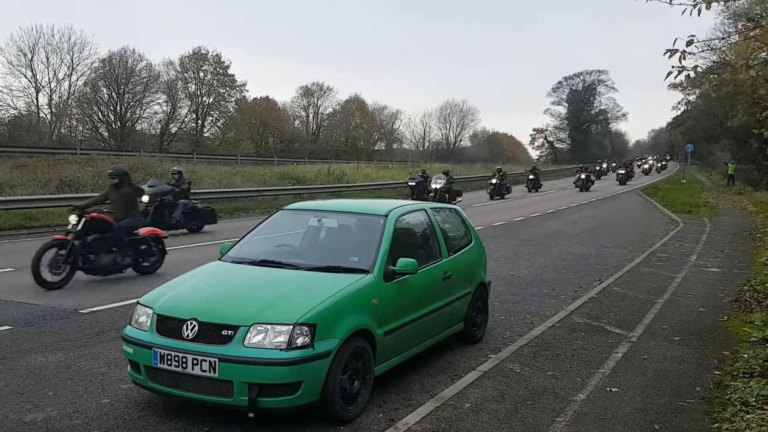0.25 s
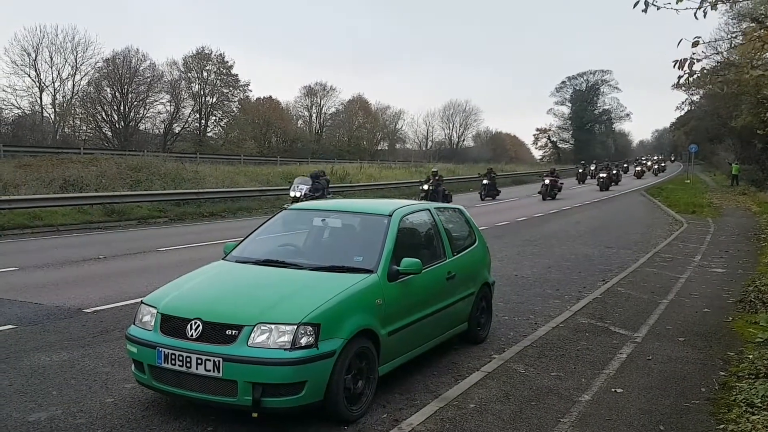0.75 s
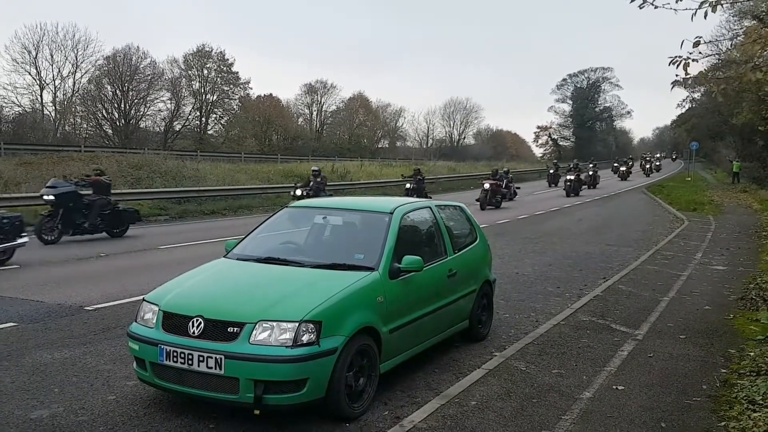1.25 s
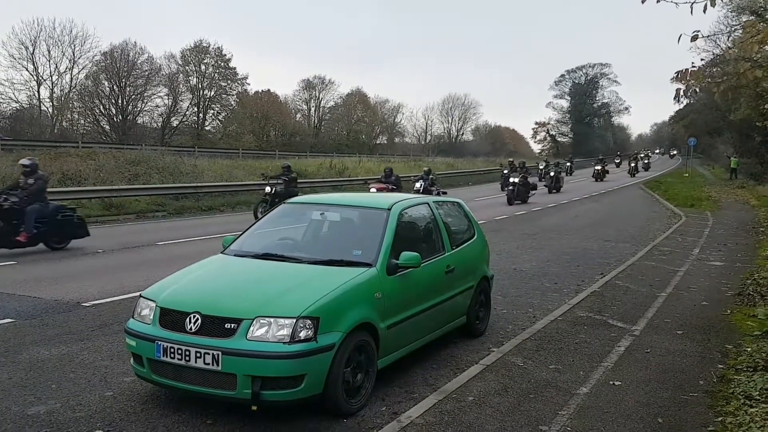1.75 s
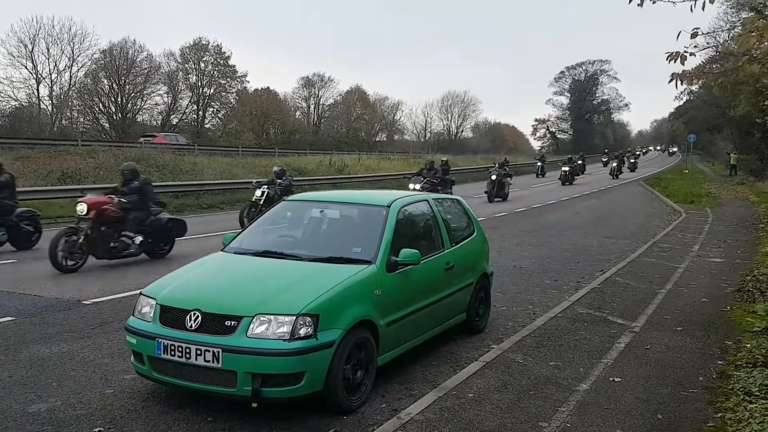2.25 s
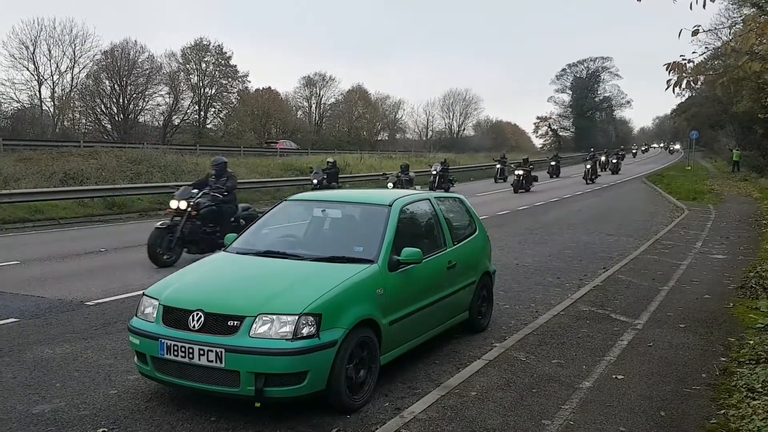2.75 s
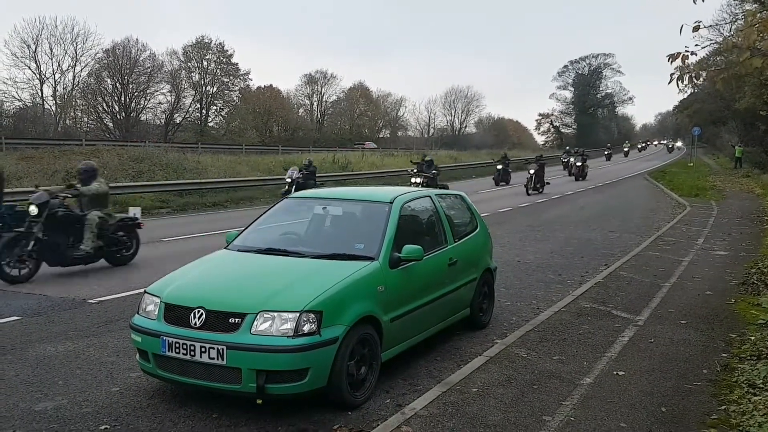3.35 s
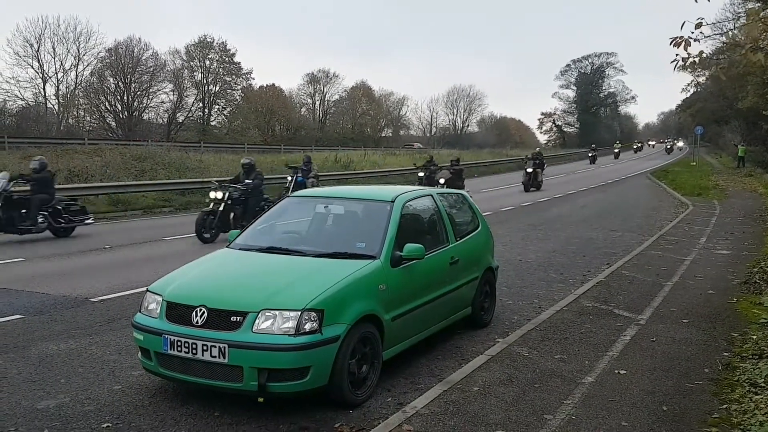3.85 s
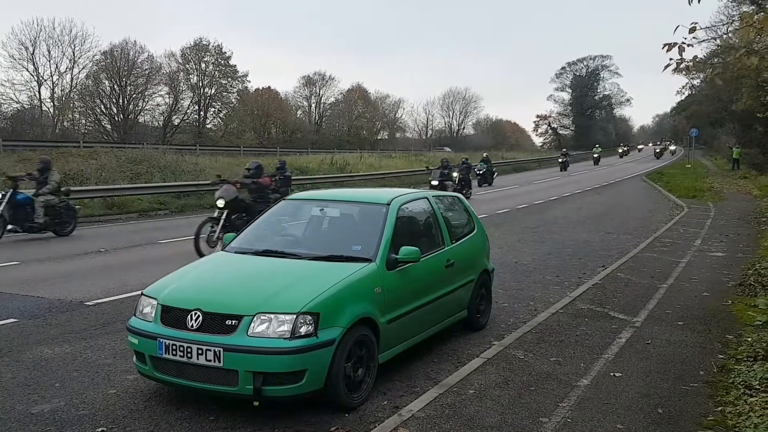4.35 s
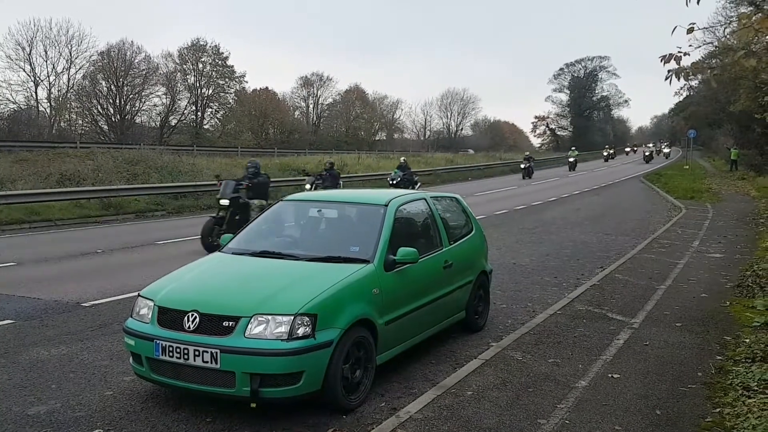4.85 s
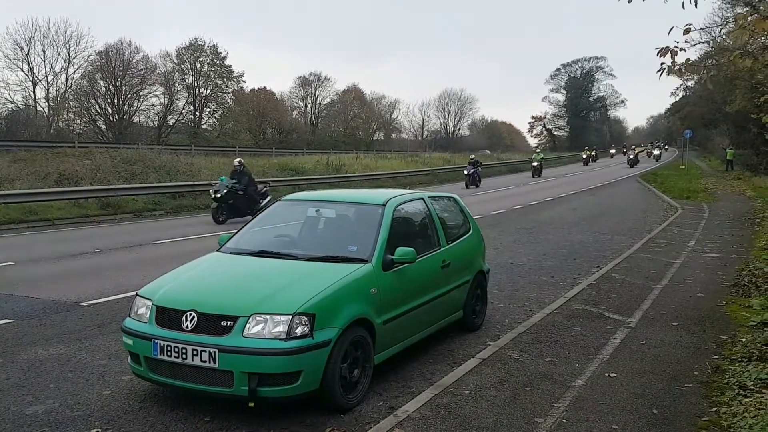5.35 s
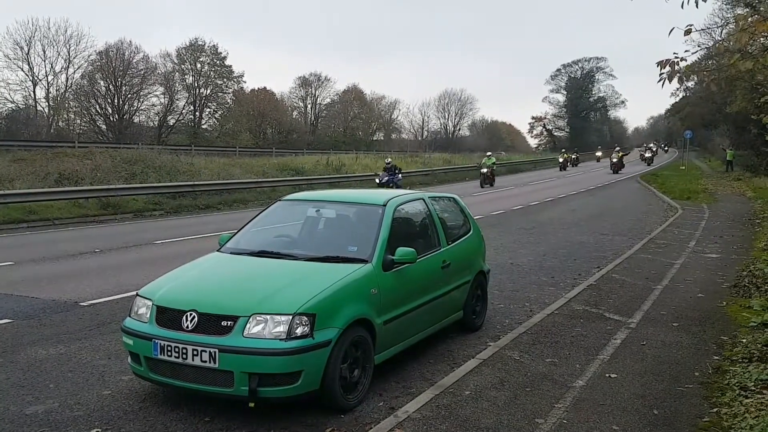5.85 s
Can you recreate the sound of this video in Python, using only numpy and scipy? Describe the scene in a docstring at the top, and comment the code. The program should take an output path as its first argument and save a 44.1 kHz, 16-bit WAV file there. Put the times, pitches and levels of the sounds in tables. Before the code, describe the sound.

Many heavy motorcycles ride by a roadside microphone, thumping unevenly and overlapping. Each swells as it comes abreast, its pitch sagging slightly as it passes. Low booms beat and waver beneath throaty barks and smooth tyre hiss. Four louder bikes stand out with open-pipe rasps and sharp cracks, strongest around three seconds; rapid backfires sputter just before the end. Open air, little echo, a faint high fizz in loud moments.

```python
"""Passing V-twin motorcycle convoy

Uneven exhaust beats of many bikes merge into a throbbing drone: clicks filtered into thump and bark.
Four loud bikes add cracking pipes, from gas bursts, short shock pulses and sagging backfire rings.
Shaped noise gives tyre hiss; sine tones give booms and swelling engine orders. Verge and trees scatter
the sound a little. A very high faint fizz, as of an overdriven recorder, swells in the loud moments."""
import sys
import numpy as np
from scipy import signal
from scipy.fft import rfft, irfft, next_fast_len
from scipy.io import wavfile
from scipy.ndimage import uniform_filter1d, minimum_filter1d

SR = 44100
rng = np.random.default_rng(int(sys.argv[2]) if len(sys.argv) > 2 else 0)


def materialize(psi):
    """Save the field psi as 16-bit PCM at rate SR to the path in sys.argv[1].

    A 1-D psi becomes a single channel; in a 2-D psi each row is a channel.
    """
    bounded = np.clip(np.atleast_2d(psi).T, -1, 1)
    quanta = np.round(bounded * 32767).astype(np.int16)
    wavfile.write(sys.argv[1], SR, quanta)


N = 269451
TIME = np.arange(N) / SR
PADDED = 2 * next_fast_len(N // 2 + SR // 4)
FREQS = np.maximum(np.arange(PADDED // 2 + 1) * SR / PADDED, 1)

# Loud-bike engine speed: (time [s], four-stroke cycles [1/s])
FIRST_SPEED = [(0, 20.4), (.5, 20.1), (1, 21.1)]
SECOND_SPEED = [(1.2, 23.5), (1.7, 24.6), (2.3, 25.93)]
THIRD_SPEED = [(2.2, 22.87), (2.7, 23.89), (3.2, 24.48), (3.7, 25.26), (4.3, 25.86), (4.9, 26.14)]
LAST_SPEED = [(5.6, 19.44), (6.1, 19.89)]
# Loud-bike firing: bike -> (speed table, time of one beat [s], second cylinder's place in cycle [0-1],
# second cylinder's strength [dB])
ENGINES = {"first": (FIRST_SPEED, .5444, .411, -10), "second": (SECOND_SPEED, 1.6079, .579, -.5),
           "third": (THIRD_SPEED, 2.8543, .404, -5), "last": (LAST_SPEED, 5.8375, .44, -2)}
# Pipes facing the listener; bark and crack before throttle boost:
# (bike, start [s], end [s], thump [dB], bark [dB], crack [dB])
LOUD_BIKES = [("first", 0, 0.47, -18, -30, -37), ("second", 1.39, 2.13, -20.5, -29, -34.5),
              ("third", 2.48, 4.45, -21, -27.5, -31), ("last", 5.7, 6.1, -18.5, -42.5, -51)]
APPROACH_S, RECEDE_S = 0.29, 0.42
# Open throttle: (bike, start [s], end [s], bark boost [dB], crack boost [dB], rasp pitch [Hz])
BURSTS = [("first", 0.34, .55, 0, 3, 2100), ("second", 1.36, 1.6, 2, 3, 1250),
          ("second", 1.66, 1.97, 3, 2, 1200), ("third", 2.6, 2.73, 4.5, 1.5, 1500),
          ("third", 2.78, 2.9, 4.5, 3.5, 2600), ("third", 2.94, 3.02, 3.5, 3, 2150),
          ("third", 3.1, 3.22, 3.5, 1, 2200), ("third", 3.9, 4.06, 0, 1.5, 2300),
          ("third", 4.15, 4.3, 0, 0.5, 2100), ("third", 4.37, 4.5, 0, 0, 1500),
          ("last", 5.705, 5.88, 5, 3, 2500)]
THROTTLE_OPEN_S, THROTTLE_CLOSE_S = 0.05, 0.099
RASP_WANDER_OCTAVES = 0.2
# Crack treble rises with rasp pitch: BRIGHT_DB applies at BRIGHT_RASP_HZ
BRIGHT_RASP_HZ, BRIGHT_EDGE_HZ, BRIGHT_DB = 2800, 5900, 3
# Exhaust spectra: (frequency [Hz], relative level [dB])
THUMP_COLOUR = [(8, -62), (22, -32), (32, -38), (45, -11), (58, -16.5), (72, 4), (95, 1.5), (130, 3.5),
                (165, -0.5), (215, -1.5), (280, -4.5), (350, -11.5), (500, -23.5), (900, -44), (3000, -87)]
OPEN_PIPE_COLOUR = [(100, -19), (280, -0.5), (420, 3), (560, -2), (700, 0.5), (900, -4), (1150, -6.5),
                    (1500, -18), (2200, -16), (4000, -38.5), (7000, -53.5), (9000, -79)]
BARK_COLOUR = [(100, -32), (280, -7), (420, 4.5), (620, 3.5), (850, -8.5), (1100, -5), (1400, -18),
               (2200, -17), (4000, -37.5), (7000, -51), (9000, -67.5)]
CRACK_COLOUR = [(300, -4), (800, 7), (1500, 12.5), (2400, 3), (3000, 0), (4200, -7), (5200, -8.5),
                (6300, -20.5), (7300, -35.5), (8500, -44.5), (14000, -44), (17000, -61.5)]

# Hardest firings: (time [s], peak level [dB], pitch [Hz], gas spit level [dB])
SNAPS = [(0.4959, -10.5, 2270, -26.5), (0.5454, -7.5, 1890, -33), (1.36, -7, 1230, -39),
         (1.444, -3.5, 1200, -41), (1.4855, -6.5, 1950, -24.5), (1.526, -9, 2040, -24),
         (1.5505, -4, 1390, -34), (1.5919, -11, 1440, -44), (1.69, -6.5, 1310, -25),
         (1.714, -10.5, 2240, -34), (1.7526, -7, 1470, -32), (1.852, -11.5, 1800, -28),
         (1.9312, -11, 1680, -16.5), (1.9714, -12, 1720, -23), (2.4507, -10, 1400, -29),
         (2.6019, -6, 1640, -35), (2.6453, -8, 1730, -32), (2.6878, -12, 1670, -20),
         (2.7305, -14.5, 1370, -29), (2.7716, -4.5, 1870, -14.5), (2.8136, -2, 2170, -16),
         (2.856, -3.0, 2170, -14), (2.8983, -3.5, 1930, -19), (2.9383, -5.5, 2110, -21),
         (2.9542, -6, 1500, -21), (2.9798, -3.5, 1990, -30), (3.0201, -4, 2030, -24),
         (3.0614, -1.5, 2200, -37), (3.103, -5.5, 2080, -40), (3.1186, -7, 1890, -27),
         (3.1429, -1.5, 1950, -28), (3.1604, -8, 1360, -30), (3.1844, -8, 1780, -44),
         (3.2656, -7.5, 1900, -43), (3.3464, -1.5, 1990, -34), (3.6538, -14, 1390, -23),
         (3.666, -8, 1940, -33), (3.6824, -9, 1880, -39), (3.8284, -12, 1260, -39), (3.9429, -6, 2290, -36),
         (3.9827, -6, 1910, -38), (3.9978, -5, 1850, -36), (4.021, -6.5, 2300, -25),
         (4.0602, -3.5, 2070, -26), (4.138, -7.5, 2130, -32), (4.1537, -5, 1700, -40),
         (4.177, -8, 2080, -39), (4.2159, -8.5, 1900, -40), (4.255, -13, 1860, -41),
         (4.2932, -10.5, 2230, -39), (4.3718, -2.5, 1740, -36)]
SNAP_WIDTH_S, SNAP_STEEPENING, SPIT_DECAY_S = .00065, .2, .0005
# Gas spit spectrum: (frequency [Hz], relative level [dB])
SPIT_COLOUR = [(1000, -20.5), (2800, -3), (3800, 5), (5000, 2), (6500, -7.5), (7600, -26.5), (8600, -32.5),
               (15000, -31.5), (17000, -39.5)]
# Backfires: (time [s], ring level [dB], settled pitch [Hz], gas puff level [dB])
BACKFIRES = [(5.6845, -18, 2400, -23), (5.7066, -13.5, 2100, -15), (5.7352, -19, 2400, -19),
             (5.7574, -14, 2000, -17), (5.7866, -10, 1900, -14), (5.8083, -16, 1900, -16.5),
             (5.8372, -4, 2200, -15), (5.8595, -11.5, 2150, -19.5), (5.889, -13, 2000, -21),
             (6.065, -21, 3000, -28), (6.091, -25, 2800, -23)]
BACKFIRE_ATTACK_S, BACKFIRE_DECAY_S, PUFF_DECAY_S = .00015, .0023, .001
BACKFIRE_SAG, BACKFIRE_SAG_S = .5, .0014
# Backfire puff spectrum: (frequency [Hz], relative level [dB])
PUFF_COLOUR = [(300, 0), (1000, 5.5), (1600, 3), (3500, 3.5), (5000, 2.5), (6400, 1.5), (7500, -25),
               (8500, -29.5), (15000, -32), (17000, -42.5)]
# Thin high ticks: (time [s], level [dB])
TICKS = [(2.7135, -22)]
# Tick spectrum: (frequency [Hz], relative level [dB])
TICK_COLOUR = [(2000, -12), (5000, -11), (6300, 7), (7200, -11), (8500, -23), (15000, -23), (17000, -34)]

# Other bikes: (time abreast [s], speed when abreast [cycles/s], relative level [dB])
PACK = [(0.198, 26.5, -5.5), (0.6, 21.6, 2.5), (1.097, 27.4, -1), (1.4, 21.5, 2.5), (1.898, 27.6, 3.5),
        (2.398, 21.8, 1.5), (2.899, 29.5, 5.5), (3.502, 21.3, 5.5), (3.9, 28, 1), (4.3, 22.2, 2.5),
        (4.799, 26.7, 2), (5.2, 21, 1), (5.4, 27.9, -5), (5.7, 22.1, -9.5)]
# Whole pack, bark before a fixed 4.5 dB lift: (time [s], thump [dB], bark [dB])
TRAFFIC = [(0, -10.5, -27), (1.0, -14.5, -29.5), (1.2, -9, -27), (1.6, -13, -26.5), (2, -15, -28),
           (2.3, -12.5, -27.5), (2.8, -16, -32.5), (3.3, -16, -33), (3.62, -18, -28.5), (4.05, -14, -29),
           (4.7, -14.5, -28.5), (5.5, -12.5, -28.5), (5.95, -16, -31.5)]
# Narrow pipe resonances: (start [s], end [s], centre [Hz], width [Hz], level [dB])
PIPE_RINGS = [(0.398, 1.075, 205.5, 78.7, -18.5), (1.146, 1.45, 1120, 300, -32.5),
              (1.453, 1.88, 1240, 600, -28.5), (1.49, 1.535, 2330, 700, -30.5),
              (1.744, 1.784, 410, 200, -25.5), (2.45, 2.95, 825, 201, -43), (3.601, 3.668, 420, 179, -24.5),
              (4.198, 4.447, 382, 202, -44), (3.55, 4.2, 1210, 805, -39), (4.3, 4.698, 1590, 800, -32.5),
              (4.99, 5.448, 211.6, 72.7, -19), (5.19, 5.217, 2030, 700, -30), (5.507, 5.63, 2360, 280, -31),
              (5.557, 5.74, 242, 100, -20.5)]
RING_FADE_S = 0.037
# Throbbing low orders, two notes each: (start [s], end [s], frequency [Hz], mean level of first note [dB],
# beat rate [1/s], time of one crest [s], second note relative to first [dB])
BOOMS = [(0.289, 0.575, 105, -19.5, 10.4, .36, 1), (0.732, 2.144, 109, -19, 3.25, 1.09, -8),
         (4.146, 4.498, 114, -28.5, 5, 4.19, 1.5), (4.96, 5.518, 110, -22, 5.9, 4.99, -0.5),
         (5.724, 6.046, 108.4, -18, 3.8, 5.77, -2), (1.092, 1.836, 85, -24.5, 3.4, 2.1, -7.5),
         (2.282, 2.63, 85.5, -22, 2.4, 2.35, -3.5), (3.528, 3.825, 85, -16.5, 3.2, 3.54, -7.5),
         (4.085, 4.396, 80.5, -22, 7.1, 4.09, 4), (4.532, 4.957, 80.5, -18.5, 8.73, 4.8, -6.5),
         (5.296, 5.9, 82, -25, 6.3, 5.35, -1)]
BOOM_FADE_S = 0.09
# Swelling engine orders: (middle [s], length [s], frequency at middle [Hz], glide [Hz/s], crest level [dB])
SWELLS = [(1.095, 1.1, 212.2, 1.5, -22.5), (1.348, 0.49, 258, 4, -26.5), (1.592, 0.16, 152.8, 1.5, -17),
          (1.743, 0.94, 222.7, 15, -21), (2.469, 0.36, 149.7, -0.5, -26), (2.904, 0.76, 242.2, 12, -30.5),
          (4.953, 0.56, 61.1, -1, -25), (5.303, 1.4, 253.8, -9.5, -33), (5.353, 0.56, 205.8, -4.5, -20),
          (5.562, 0.89, 165.4, 0.5, -19), (5.601, 1.1, 65.9, 0.5, -21.5), (5.603, 0.68, 43.8, -0.5, -27),
          (5.647, 1.1, 356.5, -6.5, -30.5), (0.155, 1.3, 460, 21, -39.5), (0.992, 1.1, 194, -10.5, -25.5),
          (1.398, 0.61, 293, 15.5, -23.5), (2.647, 0.74, 403, 11, -30), (3.3, 0.47, 244, 10.5, -28),
          (3.899, 0.6, 313, 10, -32.5), (4.251, 1.45, 378, 4, -31.5), (5.103, 1.1, 502, 0, -33.5),
          (5.746, 1.1, 601, -2.5, -36)]

# Loud moments: (crest time [s], tyre hiss [dB], treble [dB], overdrive fizz [dB])
LOUD_MOMENTS = [(0.05, -38, -29, -52.5), (.55, -50.5, -31.5, -55.5), (1.25, -35.5, -32, -57.5),
                (2, -31.5, -28.5, -56), (2.75, -37, -31.5, -59), (3.651, -33, -42.5, -62),
                (4.678, -38, -33.5, -56.5), (5.479, -32.5, -31, -52.5), (6.15, -45.5, -38, -59)]
LOUD_MOMENT_S = 0.43
# Steady floor under them: tyre hiss [dB], treble [dB], overdrive fizz [dB]
FLOOR_DB = [-35.5, -39.5, -79.5]
# Tyre hiss spectrum: (frequency [Hz], relative level [dB])
HISS_COLOUR = [(200, -22.5), (600, 8), (1000, 6.5), (1400, 5.5), (1900, 8.5), (2400, 4.5), (3200, -2),
               (4200, -1), (5200, -7.5), (6200, -11), (7200, -18.5), (8300, -35.5), (10000, -57)]
# Overdrive fizz spectrum: (frequency [Hz], relative level [dB])
FIZZ_COLOUR = [(5000, -33.5), (8500, -10.5), (11000, -5), (13000, -2), (15000, -3), (17000, -8.5)]

# Microphone ports: (frequency [Hz], left minus right [dB])
PORT_BALANCE = [(60, -0.5), (100, -0.5), (170, -1.5), (290, -2.0), (490, -1.5), (830, -1.5), (1410, -3.5),
                (2380, -6.0), (4040, -5.0), (6830, -2.5)]
# Scattered against direct sound, before each layer's offset: (frequency [Hz], level [dB])
SCATTER = [(60, -39), (250, -19.5), (600, 1), (1500, -3.5), (4000, 2.5), (12000, -11)]
SCATTER_DECAY_S = .11
NEAR_LAG_S, PACK_LAG_S = 0.00027, 0.000342  # right port behind left; the pack from a wider angle
CUTOFF_HZ = 15900


def loud_bikes():
    """Open pipes: low thump, throaty bark and a rasping crack on the firings, stronger under throttle."""
    thump = bark = crack = top = 0
    for bike, start_s, end_s, thump_db, bark_db, crack_db in LOUD_BIKES:
        speed, beat_s, split, second_db = ENGINES[bike]
        more_bark_db, more_crack_db, rasp_hz = throttle(bike)
        clicks = firings(in_time(speed)[0], beat_s, split, second_db, uneven_db=1.2, jitter_s=.00006)
        clicks = clicks * held(start_s, end_s, APPROACH_S, RECEDE_S)
        thump = thump - clicks * from_db(thump_db)
        bark = bark + clicks * from_db(bark_db + more_bark_db)

        crack_clicks = clicks * between_snaps() * from_db(crack_db + more_crack_db)
        burst = puffs(crack_clicks, burst_s=0.0008, rough=0.25)
        wandering_hz = rasp_hz * 2 ** (RASP_WANDER_OCTAVES * drift(20))
        crack = crack + rasp(burst, wandering_hz, width_hz=470, peak_db=3.0, plain_db=-1.0)
        top = top + burst * from_db(BRIGHT_DB) * (rasp_hz / BRIGHT_RASP_HZ) ** 6
    crack = crack + filtered(top, 1 / (1 + (BRIGHT_EDGE_HZ / FREQS) ** 6))
    bark = puffs(bark, burst_s=0.0048, rough=0.1)
    return coloured(thump, THUMP_COLOUR) + coloured(bark, OPEN_PIPE_COLOUR) + coloured(crack, CRACK_COLOUR)


def throttle(bike):
    """Open throttle boosts bark and crack [dB]; rasp pitch [Hz] glides from burst to burst."""
    bursts = [row[1:] for row in BURSTS if row[0] == bike]
    opened = np.array([held(start, end, THROTTLE_OPEN_S, THROTTLE_CLOSE_S) for start, end, *_ in bursts])
    opened = opened / np.maximum(opened.sum(axis=0), 1)
    start_s, end_s, bark_db, crack_db, rasp_hz = np.transpose(bursts)
    return bark_db @ opened, crack_db @ opened, np.interp(TIME, (start_s + end_s) / 2, rasp_hz)


def firings(cycles_per_s, beat_s, split, second_db, uneven_db, jitter_s):
    """Two cylinders fire once a cycle, unevenly spaced: the loping V-twin beat, as clicks of rms 1."""
    turns = np.cumsum(cycles_per_s) / SR
    turns = turns - np.interp(beat_s, TIME, turns)
    cycle, clicks = np.arange(-220, 220), np.zeros(N)
    for place, db in ((0, 0), (split, second_db)):
        late, strength = rng.standard_normal((2, len(cycle)))
        fire_s = np.interp(cycle + place, turns, TIME, left=-1, right=-1) + jitter_s * late
        at = (fire_s * SR).astype(int)
        heard = (at >= 0) & (at < N)
        clicks[at[heard]] = from_db(db + uneven_db * strength[heard])
    return rms_one(clicks)


def puffs(clicks, burst_s, rough):
    """Each click keeps a pulse and gains a noise burst, like turbulent gas, that dies in milliseconds."""
    r = np.exp(-3 / (burst_s * SR))
    power = signal.lfilter([(1 - r) ** 2], [1, -2 * r, r * r], clicks ** 2 + 1e-18)
    burst = np.sqrt(np.abs(power))
    rough = np.clip(rough, 0, 1)
    return -np.sqrt(1 - rough) * clicks + np.sqrt(rough) * burst * rng.standard_normal(N)


def rasp(x, centre_hz, width_hz, peak_db, plain_db):
    """A two-pole pipe resonance of moving pitch, on top of the plain sound."""
    r, out, state = np.exp(-np.pi * width_hz / SR), np.zeros(N), np.zeros(2)
    zeros = (1 - r * r) / 2 * np.array([1, 0, -1])
    for i in range(0, N, 1024):
        block = slice(i, i + 1024)
        poles = [1, -2 * r * np.cos(2 * np.pi * centre_hz[i] / SR), r * r]
        out[block], state = signal.lfilter(zeros, poles, x[block], zi=state)
    return from_db(plain_db) * x + from_db(peak_db) * out


def between_snaps(reach_s=.004):
    """1 where firings are ordinary, 0 around each snap or backfire."""
    plain = np.ones(N)
    for s, *_ in list(SNAPS) + list(BACKFIRES):
        plain[int((s - reach_s) * SR):int((s + reach_s) * SR)] = 0
    return plain


def snaps():
    """A hard firing leaves the pipe as a few waves that steepen into a shock, with a spit of gas."""
    out, half = np.zeros(N + SR), 128
    since = np.arange(-half, half) / SR
    across = since / SNAP_WIDTH_S
    steepened = since * (1 + SNAP_STEEPENING * across / 2)
    for s, db, hz, _ in SNAPS:
        at = int(s * SR)
        out[at - half:at + half] += from_db(db) * np.exp(-across ** 2) * np.cos(2 * np.pi * hz * steepened)
    spits = [(s - SPIT_DECAY_S, spit_db) for s, _, _, spit_db in SNAPS]  # spit peaks on the snap
    return out[:N] + gas_puffs(spits, SPIT_COLOUR, SPIT_DECAY_S)


def backfires():
    """Fuel pops in the pipe: a broad puff, and a ring that starts high and sags as it dies."""
    out, length = np.zeros(N + SR), 1024
    age = TIME[:length]
    shape = (1 - np.exp(-age / BACKFIRE_ATTACK_S)) * np.exp(-age / BACKFIRE_DECAY_S)
    sagging = np.cumsum(1 + BACKFIRE_SAG * np.exp(-age / BACKFIRE_SAG_S)) / SR
    for s, db, hz, _ in BACKFIRES:
        at = int(s * SR)
        out[at:at + length] -= from_db(db) * shape * np.sin(2 * np.pi * hz * sagging)
    rows = [(s, puff_db) for s, _, _, puff_db in BACKFIRES]
    return out[:N] + gas_puffs(rows, PUFF_COLOUR, PUFF_DECAY_S)


def gas_puffs(rows, colour, decay_s):
    """Short spurts of turbulent gas as enveloped noise; rows of (time [s], level [dB])."""
    out, length = np.zeros(N + SR), 512
    gas = coloured(rng.standard_normal(N), colour)
    shape = swell_and_die(TIME[:length] / decay_s)
    for s, db in rows:
        at = int(s * SR)
        puff = shape * gas[at:at + length]
        out[at:at + length] += from_db(db) * rms_one(puff) * np.sqrt(np.mean(shape ** 2))
    return out[:N]


def pack_firings(pass_s=.6, doppler=.012, speeding_up=.022, beam_s=0.23):
    """Bikes swell abreast; pitch sags in passing (Doppler) and climbs with engine speed.
    Returns all firings, and those of the nearest bikes, whose pipes beam treble at the listener."""
    clicks = power = nearest = nearest_power = 0
    for abreast_s, cycles_per_s, db in PACK:
        since = TIME - abreast_s
        along = since / pass_s
        distance = np.hypot(1, along)
        speed = cycles_per_s * (1 - doppler * along / distance + speeding_up * since + .002 * drift(3))
        beat = firings(speed, rng.uniform(0, 1), 315 / 720, -4.0, uneven_db=1.22, jitter_s=0.0001)
        gain = from_db(db) / distance
        beam = 1 / (1 + (since / beam_s) ** 2)
        clicks, power = clicks + gain * beat, power + gain ** 2
        nearest, nearest_power = nearest + beam * beat, nearest_power + beam ** 2
    return clicks / np.sqrt(power), nearest / np.sqrt(nearest_power)


def pack(clicks, nearest, hiss_gain, treble_gain):
    """Merged exhaust beats, valve clatter on the firings, smooth tyre hiss between them."""
    thump_db, bark_db = in_time(TRAFFIC)
    thump = from_db(thump_db) * coloured(-clicks, THUMP_COLOUR)
    bark = from_db(bark_db + 4.5) * coloured(puffs(clicks, burst_s=0.0085, rough=0.25), BARK_COLOUR)
    clatter = puffs(nearest, burst_s=0.0017, rough=0.75)
    tyres = from_db(1.0) * rng.standard_normal((2, N))  # spread along the road: unlike in the two ports
    hiss = coloured(clatter + tyres, HISS_COLOUR)
    treble = filtered(hiss, 1 / (1 + (3600 / FREQS) ** 4))
    return thump + bark + hiss_gain * (hiss - treble) + treble_gain * treble


def pipe_rings(clicks):
    """Gas bursts of the pack excite one narrow pipe resonance after another."""
    gas, out = puffs(clicks, burst_s=0.0014, rough=0.72), 0
    for start_s, end_s, hz, width_hz, db in PIPE_RINGS:
        band = signal.butter(2, [hz - width_hz / 2, hz + width_hz / 2], "band", fs=SR, output="sos")
        ring = rms_one(signal.sosfilt(band, gas))
        out = out + from_db(db) * held(start_s, end_s, RING_FADE_S, RING_FADE_S) * ring
    return out


def booms(waver_rad=0.97, flutter_db=3.5, wander_hz=2.204):
    """A low engine order passed by the silencers; two bikes at nearly equal revs beat and waver."""
    out = 0
    for start_s, end_s, hz, db, beats_per_s, crest_s, second_db in BOOMS:
        turns = np.cumsum(hz + wander_hz * drift(6)) / SR + rng.random()
        phase = 2 * np.pi * turns + waver_rad * drift(25)
        second_phase = phase + 2 * np.pi * beats_per_s * (TIME - crest_s)
        pair = np.sin(phase) + from_db(second_db) * np.sin(second_phase)
        gain = np.sqrt(2) * from_db(db + flutter_db * drift(25))
        out = out + gain * held(start_s, end_s, BOOM_FADE_S, BOOM_FADE_S) * pair
    return out


def swells():
    """Single engine orders meet a pipe resonance, rise out of the drone and sink back: gliding sines."""
    out = 0
    for middle_s, length_s, hz, glide_hz_per_s, db in SWELLS:
        since = TIME - middle_s
        shape = np.cos(np.pi * np.clip(since / length_s, -.5, .5))
        turns = np.cumsum(hz + glide_hz_per_s * since + drift(8)) / SR + rng.random()
        out = out + np.sqrt(2) * from_db(db) * shape * np.sin(2 * np.pi * turns)
    return out


def loud_moment_gains():
    """Gains of tyre hiss, treble and fizz: the loud moments add in power to a steady floor."""
    power = from_db(FLOOR_DB)[:, None] ** 2
    for crest_s, *levels_db in LOUD_MOMENTS:
        swell = 1 / (1 + ((TIME - crest_s) / LOUD_MOMENT_S) ** 2)
        power = power + (from_db(levels_db)[:, None] * swell) ** 2
    return np.sqrt(power)


def fizz(clicks):
    """Very high faint fizz, as of an overdriven recorder: noise bursts, unlike in the two channels."""
    channels = np.array([puffs(clicks, burst_s=0.0072, rough=0.88) for _ in range(2)])
    return coloured(channels, FIZZ_COLOUR)


def roadside(x, scatter_db, lag_s):
    """Direct sound reaches the left port first; verge and trees add a diffuse tail, unlike in each port."""
    length = SR // 4
    echoes = rng.standard_normal((2, length)) * np.exp(-TIME[:length] / SCATTER_DECAY_S)
    echoes = rfft(echoes / np.sqrt(np.sum(echoes ** 2, axis=1, keepdims=True)), PADDED)
    direct = np.exp(-2j * np.pi * FREQS * np.array([[0], [lag_s]]))
    share = gain_at_hz(SCATTER) * from_db(scatter_db)
    balance = gain_at_hz(PORT_BALANCE) ** np.array([[.5], [-.5]])
    return filtered(x, balance * (direct + share * echoes) / np.hypot(1, share))


def limiter(x, ceiling_db=-3.5, release_db_per_s=150):
    """Gain ducks just ahead of loud peaks, then recovers; caps the port mean and each port."""
    mean_peak = np.abs(x.mean(axis=0)) / from_db(ceiling_db)
    port_peak = np.abs(x).max(axis=0) / .97
    over_db = 20 * np.log10(np.maximum(np.maximum(mean_peak, port_peak), 1))
    release_db = release_db_per_s * TIME
    duck_db = np.maximum.accumulate(over_db + release_db) - release_db
    return x * from_db(uniform_filter1d(minimum_filter1d(-duck_db, size=180), size=180))


def held(start_s, end_s, attack_s, release_s):
    """Gaussian rise to 1, hold from start to end, Gaussian fall."""
    before = np.minimum(TIME - start_s, 0) / attack_s
    after = np.maximum(TIME - end_s, 0) / release_s
    return np.exp(-before ** 2 - after ** 2)


def swell_and_die(age):
    """Rise to 1 at age 1, then decay."""
    return age * np.exp(1 - age)


def drift(per_s):
    """Slow random wander: normal draws, per_s of them a second, joined by straight lines."""
    return np.interp(TIME * per_s, np.arange(1000), rng.standard_normal(1000))


def coloured(x, colour):
    """Causal minimum-phase filter of the given colour; white noise keeps its power."""
    cepstrum = irfft(np.log(gain_at_hz(colour)))
    cepstrum[1:PADDED // 2] *= 2
    cepstrum[PADDED // 2 + 1:] = 0
    response = np.exp(rfft(cepstrum))
    return filtered(x, response / np.sqrt(np.mean(np.abs(response) ** 2)))


def filtered(x, response):
    """Apply a frequency response."""
    return irfft(rfft(x, PADDED) * response)[..., :N]


def gain_at_hz(points):
    """Spectrum table to gain at every frequency, interpolated over log frequency."""
    hz, db = np.transpose(points)
    return from_db(np.interp(np.log(FREQS), np.log(hz), db))


def in_time(rows):
    """One curve over time per table column."""
    s, *columns = np.transpose(rows)
    return [np.interp(TIME, s, c) for c in columns]


def rms_one(x):
    """Scale to unit power."""
    return x / np.sqrt(np.mean(x ** 2) + 1e-20)


def from_db(db):
    """Decibels to gain."""
    return 10 ** (np.asarray(db) / 20)


def scene():
    """Loud bikes, rings and tones with little scatter; pack with more; fizz with none."""
    clicks, nearest = pack_firings()
    hiss_gain, treble_gain, fizz_gain = loud_moment_gains()
    cracks = snaps() + backfires() + gas_puffs(TICKS, TICK_COLOUR, SPIT_DECAY_S)
    close = loud_bikes() + pipe_rings(nearest) + cracks + swells() + booms()
    near = roadside(close, scatter_db=-9.0, lag_s=NEAR_LAG_S)
    far = roadside(pack(clicks, nearest, hiss_gain, treble_gain), scatter_db=-5.5, lag_s=PACK_LAG_S)
    return near + far + fizz_gain * fizz(clicks)


def record(dry):
    """Limit loud peaks, then a steep low-pass cuts the top."""
    low_pass = signal.ellip(10, .1, 80, CUTOFF_HZ, fs=SR, output="sos")
    return signal.sosfilt(low_pass, limiter(dry))


dry = scene()
out = record(dry)
materialize(out)
```